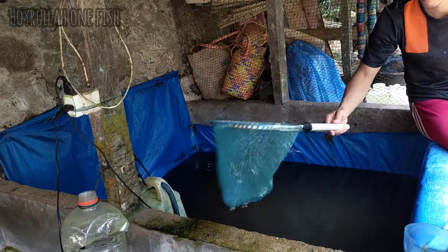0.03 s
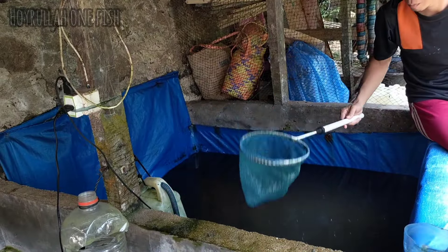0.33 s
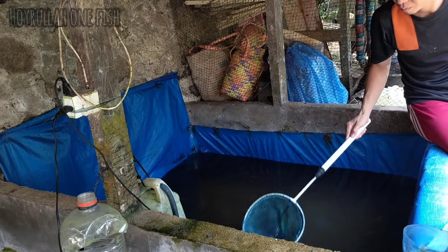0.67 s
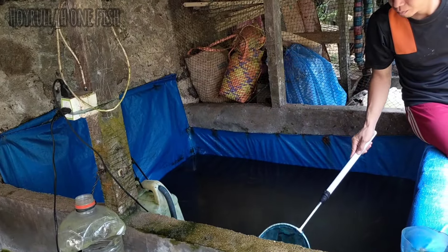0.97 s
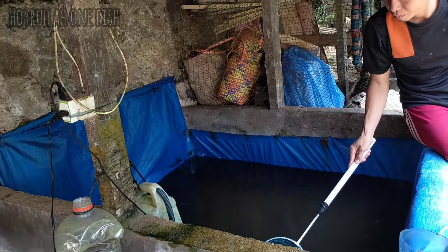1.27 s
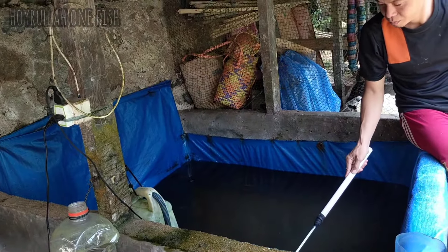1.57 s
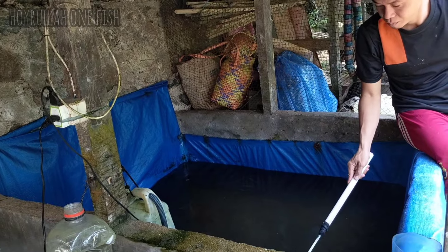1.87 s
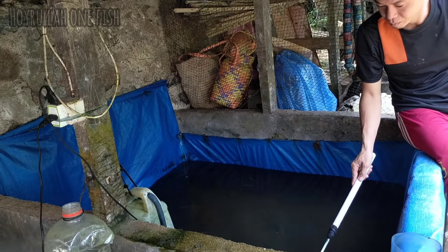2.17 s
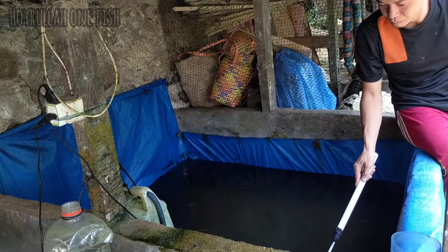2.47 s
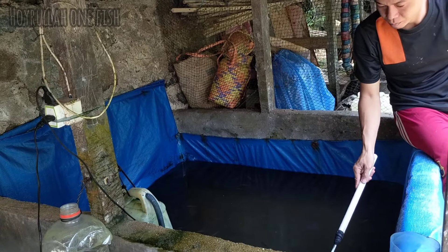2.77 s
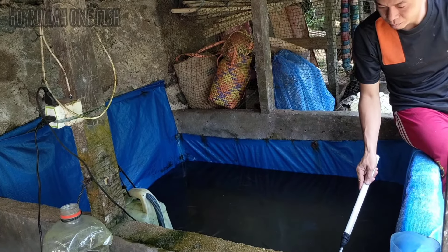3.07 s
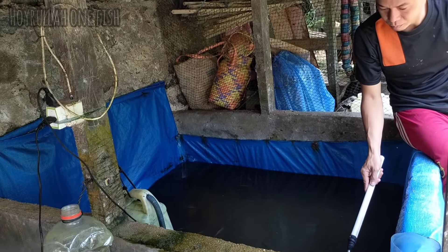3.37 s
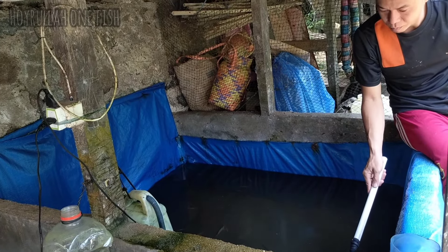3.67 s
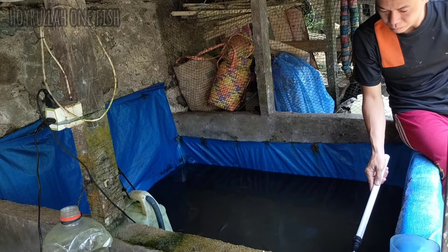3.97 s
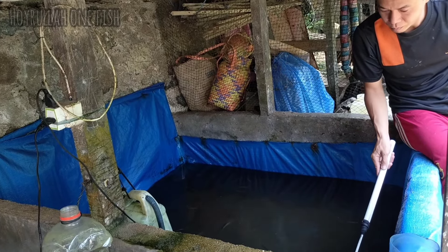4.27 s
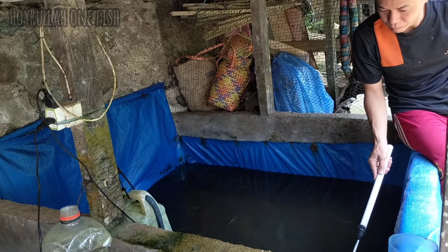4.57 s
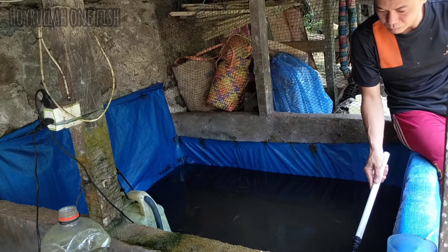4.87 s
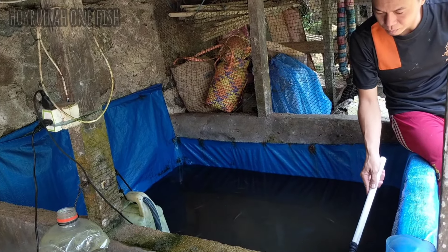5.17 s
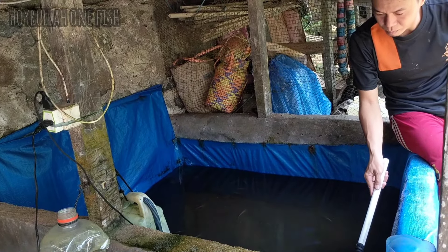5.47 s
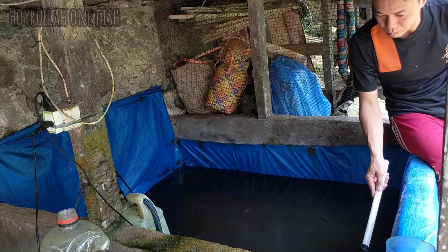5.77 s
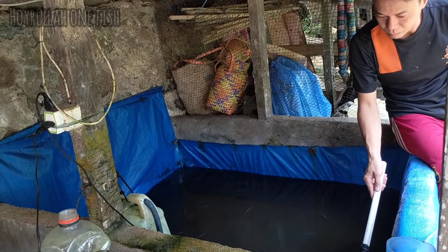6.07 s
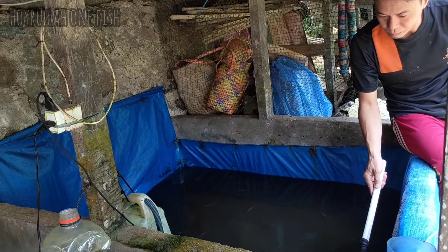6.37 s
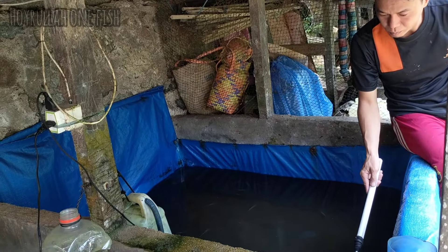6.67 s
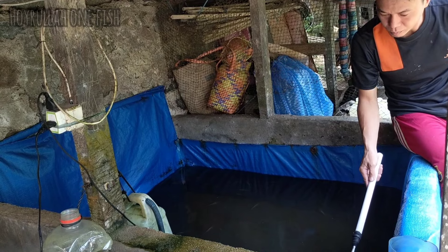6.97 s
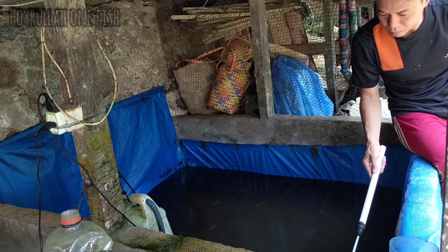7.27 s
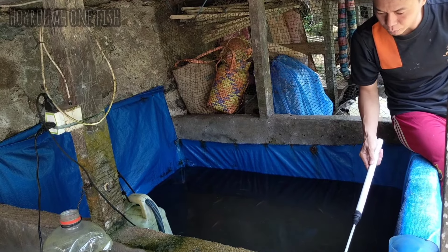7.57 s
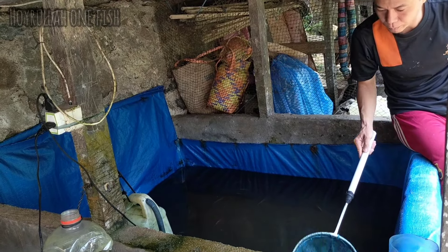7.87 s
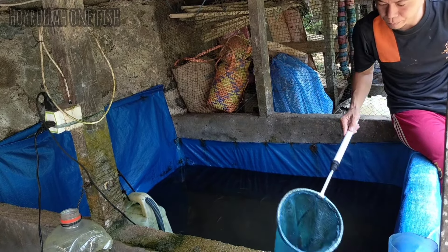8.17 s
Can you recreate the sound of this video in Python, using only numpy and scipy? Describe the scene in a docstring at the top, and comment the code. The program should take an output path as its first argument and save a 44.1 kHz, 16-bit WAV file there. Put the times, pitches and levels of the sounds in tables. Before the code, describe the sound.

A wet hand net flicks drops and sloshes in a tank while a chick peeps repeatedly and engines hum outside.

```python
"""In a low-roofed shed, a hand net is flicked dry, dipped into a tarpaulin-lined tank and drawn along.
The wet mesh snaps, drops plink and trapped air bubbles gulp; cloth swishes on the rim as an arm reaches.
One chick peeps over and over, a second cheeps softly, and something metal clinks once and rings.
Outside, the exhaust pulses of two engines drone away down a road while a third engine idles."""
import sys
import numpy as np
from scipy import signal
from scipy.fft import rfft, irfft, next_fast_len
from scipy.io import wavfile
from scipy.ndimage import uniform_filter1d, map_coordinates

SR = 44100
rng = np.random.default_rng(int(sys.argv[2]) if len(sys.argv) > 2 else 0)


def to_wav(sig):
    """Store sig (one row per channel, or 1-D mono) as 16-bit WAV at the path in sys.argv[1].

    Samples outside -1..1 are clipped; the rate is SR.
    """
    pcm = np.clip(np.atleast_2d(sig), -1, 1) * 32767
    pcm = np.round(pcm).astype(np.int16)
    wavfile.write(sys.argv[1], SR, pcm.T)  # frames by channels


N = 371322
T = np.arange(N) / SR

# The tone colour of each kind of noise: frequency_hz, level_db
RUMBLE_COLOUR = [(18, -29), (30, 24), (50, 0), (60, 1), (75, 23), (100, 15.5), (130, 19.5), (160, 14.5),
                 (190, 9.5), (240, 0.5), (400, -42.5)]
EXHAUST_COLOUR = [(150, -10.5), (240, 2), (330, -0.5), (480, -6), (750, -10.5), (1100, -18.5), (1800, -49)]
TYRE_COLOUR = [(600, -0.5), (1200, 0.5), (1800, -2), (2500, 2.5), (3400, 0), (4400, -10.5), (6000, -14),
               (8000, -22), (11000, -23), (15000, -23)]
FAINT_HISS_COLOUR = [(500, 12.5), (1500, 1.5), (3200, -16), (5000, -9.5), (6400, -25), (7200, -9.5),
                     (7900, -40), (11000, -44), (15500, -35)]
SCRAPE_COLOUR = [(500, -7), (900, 2), (1600, 8), (2400, 5), (4500, -6), (7000, -19), (10000, -25),
                 (15000, -41)]
CLOTH_COLOUR = [(1200, -1), (3000, 14), (5500, 7.5), (8000, 0.5), (11000, 0), (13500, 2), (15500, -4)]
# How alike the two ears hear noise from all around: frequency_hz, likeness (1 = the same)
EAR_LIKENESS = [(60, 0.98), (170, 0.91), (350, 0.91), (700, 0.63), (1300, 0.34), (3000, 0.12),
                (8000, 0.034)]
# How loud the road rumbles: time_s, level_db
RUMBLE_LEVELS = [(0, -41.5), (.7, -40), (1.25, -44.5), (2.1, -44), (2.7, -41), (5, -50), (6.4, -46),
                 (6.8, -49), (7.6, -46.5), (8.42, -48)]

# Groups of exhaust tones for the deep, light and idling engines: multiple_of_firing_rate, level_db
DEEP_BOOM_TONES = [(1, -8), (1.5, -16), (2, 0)]
DEEP_DRONE_TONES = [(3, 0)]
DEEP_HUM_TONES = [(4, 0), (5, -13.5), (6, -12)]
DEEP_BARK_TONES = [(7, -7), (8, -7), (9, -1), (10, -1), (11, -3.5), (12, -10), (13, -13), (15, -17),
                   (17, -18)]
LIGHT_BOOM_TONES = [(1, -6), (2, -2.5), (3, -5.5)]
LIGHT_DRONE_TONES = [(5, 0)]
LIGHT_BARK_TONES = [(4, -15), (6, -6), (7, -6), (8, -12), (10, -20)]
IDLE_BOOM_TONES = [(2, 0.0039)]
IDLE_BARK_TONES = [(3, -2.5), (4, -10)]
# How fast the deep engine fires: time_s, rate_hz
DEEP_FIRING = [(0, 36.4), (1.2, 35.85), (2.3, 35), (3.4, 33.7), (4.8, 33.4), (8.42, 33.7)]
# How loud each part of the deep engine's sound is as it passes: time_s, boom_db, drone_db, hum_db, bark_db
DEEP_LEVELS = [(0, -47, -62, -58, -65), (.6, -45, -62, -52, -61), (1.3, -40, -53, -49, -54),
               (1.8, -44, -47, -40.5, -54), (2.2, -45, -48, -41.5, -55), (2.55, -36, -44, -37, -53.5),
               (3.05, -45, -48, -42.5, -51.5), (3.5, -41, -44.5, -42.5, -54), (4, -43, -49, -46.5, -58.5),
               (4.55, -38, -47, -44.5, -58), (4.8, -39.5, -47, -40.5, -60), (5.2, -45, -44, -46.5, -65),
               (5.85, -54, -43.5, -54, -72), (6.7, -52, -55, -52, -73), (7.7, -58, -64, -61, -74),
               (8.42, -60, -63, -63, -69)]
# How loud the light engine drones: time_s, level_db
LIGHT_DRONE_LEVELS = [(0, -43), (.3, -44), (.6, -40), (.9, -40), (1.15, -50), (1.33, -43.5), (1.9, -47),
                      (2.4, -51), (4, -54), (6, -62), (8.42, -59)]

# Calls of the first and second chick, timed at the dive in pitch: time_s, level_db, pitch_hz, direct_db
PEEP_CALLS = [(.285, -48, 4160, -4), (.642, -47, 4260, 1), (1.027, -45.5, 4250, 0.5), (1.471, -49, 4190, 1),
              (1.869, -48, 4240, -1), (2.262, -52.5, 4200, -5), (2.671, -49, 4140, -3),
              (3.051, -52, 3950, -1), (4.137, -50.5, 4070, -4), (4.475, -49, 4110, -3),
              (4.836, -47, 4120, -3), (5.181, -50.5, 4280, -2.5), (5.569, -50.5, 4020, -3),
              (5.912, -50.5, 4000, 1), (6.274, -47.5, 4130, -6), (6.635, -49.5, 4190, 1),
              (6.987, -50, 3960, 0), (7.33, -50, 3980, -1.5), (7.845, -53.5, 4000, -4),
              (8.237, -54.5, 3920, -1)]
CHEEP_CALLS = [(4.405, -61, 3100, 0), (4.655, -55, 3550, 2), (5.06, -60, 3400, 0), (5.34, -58, 3450, 0),
               (5.715, -55, 3400, 0), (5.86, -55, 3500, 0), (7.96, -61, 3600, -2), (8.09, -60, 3600, 0)]
# One call of each, a thin lead-in and then a loud falling note: time_from_dive_s, pitch_ratio, level_db
PEEP_CURVE = [(-.072, 1.32, -30), (-.052, 1.32, -19.5), (-.032, 1.28, -21), (-.014, 1.23, -17),
              (-.004, 1.12, -17), (0, 1, 1.5), (.007, .95, 1), (.018, .87, -1.5), (.031, .78, -5),
              (.046, .67, -15)]
CHEEP_CURVE = [(-.015, 1.15, -24), (0, 1, -2), (.019, .91, -3.5), (.04, .8, -20)]
# Metal touching and chattering: start_s, level_db, brightness_db, ring_over_scrape_db
METAL_TAPS = [(3.5139, -44, -2, -2), (3.5165, -40.5, 4.5, -3.5), (3.529, -58, 3, -10), (3.537, -43, 10, -7),
              (3.546, -48, 10, -3), (3.553, -48, 15, -10), (3.565, -48, 12, -4)]
# The notes the metal rings with: pitch_hz, level_db, fade_s
METAL_NOTES = [(985, -15, .2), (1228, -14, .1), (1970, -16, .15), (2000, -7.5, .26), (2142, -8, .16),
               (2172, -11, .16), (2202, -5, .23), (2601, -10, .22), (2676, -10, .2), (2734, -14, .18),
               (3325, -11, .26), (3758, -14, .2), (4007, -9, .26), (4035, -11, .26), (4770, -15, .22),
               (5179, -16, .2), (5582, -15, .2), (5900, -17, .2), (6772, -17, .33), (8350, -20, .3),
               (8440, -20, .25), (10060, -25, .25), (11860, -31, .24), (13420, -29, .24)]

# Cloth sliding on the tank's rim: peak_s, level_db, rise_s, fall_s
CLOTH_SLIDES = [(.855, -58.5, 0.13, 0.051), (1.085, -58, 0.039, 0.088), (2.75, -69, .3, 0.31),
                (3.41, -60.5, 0.016, 0.03), (3.73, -58, 0.086, 0.061), (3.945, -63, 0.1, 0.14),
                (4.885, -65, 0.039, 0.027), (4.97, -66, 0.03, 0.022), (5.1, -67, 0.05, 0.043),
                (5.26, -71.5, 0.36, 0.24), (5.68, -64, 0.065, 0.05), (5.985, -64, 0.065, 0.059),
                (6.23, -62.5, 0.046, 0.058), (6.31, -63, 0.063, 0.032), (6.45, -67.5, 0.083, 0.089),
                (7.07, -71.5, 0.03, 0.17), (7.3, -71, 0.037, 0.074), (7.94, -72, 0.24, 0.53),
                (8.09, -78, 0.056, 0.084), (8.26, -73, 0.044, 0.17)]
# Water heaved by the net: start_s, level_db, big_bubble_pitch_hz, length_s, small_over_big_db
NET_SLOSHES = [(1.225, -56, 710, 0.045, -13), (1.566, -62, 695, 0.095, -18), (1.847, -56.5, 710, 0.41, -22),
               (2.7, -58, 622, .5, -18), (4.345, -78, 374, 0.2, 12), (4.55, -55.5, 402, 0.17, -32),
               (5.026, -56, 490, 0.038, -12), (6.51, -50, 400, 0.03, -24), (7.06, -46, 318, 0.044, -12),
               (7.097, -42.5, 263, .1, -23), (7.117, -43, 177.6, 0.12, -17), (7.257, -55.5, 372, 0.054, -8),
               (7.572, -60.5, 420, 0.075, -4)]
# Single drops and bubbles: start_s, level_db, pitch_hz, fade_s, left_over_right_db
WATER_DROPS = [(0.0587, -40, 3060, .02, -6), (.0727, -24, 4110, 0.012, 13), (0.0893, -32, 3850, 0.016, 11),
               (.090, -37, 3430, 0.024, -7), (.1198, -34, 3410, 0.016, -2), (.1198, -40, 3820, 0.011, 4),
               (.132, -46, 2380, 0.031, -1), (.165, -45.5, 3380, 0.031, -6), (1.22, -48, 2450, .03, -8),
               (1.221, -46, 910, 0.046, -2), (1.235, -47, 657, 0.045, 0), (5.028, -55.5, 1230, 0.072, -3),
               (5.05, -55, 914, .07, -2), (5.795, -40, 440, 0.047, 0), (7.061, -45, 840, .05, 5),
               (7.088, -53, 740, .05, 0), (7.118, -25.5, 147, .09, 0), (7.148, -48.5, 766, 0.083, 2),
               (7.185, -42, 265, 0.13, 0), (7.262, -61, 1260, 0.098, -9), (7.58, -49, 529, .08, -6),
               (7.595, -53.5, 750, 0.1, -7), (7.605, -62, 1260, .07, -5)]
# Wet mesh snapping and water spattering:
# start_s, level_db, pitch_hz, width_octaves, fade_s, left_over_right_db, spray_over_snap_db
WET_SNAPS = [(.046, -44, 3880, .35, 0.028, 13, -30), (.050, -45, 1650, .25, .05, 3, -30),
             (.053, -36, 2950, 0.35, 0.14, -8, -24), (.062, -42, 2900, 0.29, .04, -5, -11),
             (0.0727, -38, 4500, 0.28, 0.012, 3, -34), (0.072, -39.5, 1190, 0.67, 0.094, 4, -30),
             (.079, -36.5, 4460, 0.078, 0.036, -3, -30), (.079, -40, 2620, 0.2, 0.058, -6, -30),
             (.088, -36, 3930, 0.21, 0.027, 0, -18), (0.1197, -40.5, 3600, 0.28, .022, 0, -7),
             (0.12, -45, 12300, .25, 0.014, -2, -30), (.164, -53, 3400, 0.33, .03, -3, -11),
             (.22, -52, 4800, 0.22, 0.034, 3, -30), (1.219, -56, 2100, .74, .08, -8, -30),
             (1.238, -50, 1590, 0.59, 0.13, -4, -30), (6.296, -53, 2700, 0.39, 0.068, -10, -30),
             (7.06, -47, 520, 0.45, 0.077, -7, -35), (7.281, -63, 2400, .17, .05, 0, -25),
             (8.083, -71, 13300, .15, .05, -2, -20), (8.12, -74, 11300, .12, .06, -2, -20),
             (8.275, -68, 6100, .12, .05, 4, -20)]
# A rising blip after the flick: time_s, pitch_hz, level_db
BLIP_CURVE = [(.23, 860, -62), (.238, 890, -49), (.252, 930, -49), (.261, 1030, -56), (.269, 1120, -49),
              (.277, 1400, -55), (.286, 1900, -49), (.292, 2150, -51), (.298, 2500, -45), (.305, 2850, -58)]


def gain(db):
    """Turn decibels into a number to multiply by."""
    return 10 ** (np.asarray(db) / 20)


def normalise(x):
    """Scale a sound to an average power of 1."""
    return x / np.sqrt(np.mean(x ** 2) + 1e-20)


def curves(table, t=T):
    """Join the points in each column of a table with straight lines in time."""
    times, *columns = np.transpose(table)
    return [np.interp(t, times, column) for column in columns]


def across_spectrum(points, size):
    """Spread (frequency_hz, value) points over every frequency of a sound `size` samples long."""
    hz, value = np.transpose(points)
    return np.interp(np.log(np.fft.rfftfreq(size, 1 / SR) + 1), np.log(hz), value)


def colour(x, points):
    """Turn each frequency of a sound up or down."""
    return irfft(rfft(x) * gain(across_spectrum(points, len(x))), len(x))


def pan(db):
    """Left and right gains: a positive value leans left."""
    return gain(np.array([[db], [-db]]) / 2)


def add(out, start_s, x):
    """Mix a sound in at a given time."""
    i = max(int(start_s * SR), 0)
    out[..., i:i + x.shape[-1]] += x[..., :out.shape[-1] - i]


def fade(t, fade_s):
    """Die away by 60 dB every fade_s seconds."""
    return np.exp(-np.log(1000) * t / fade_s)


def wander(rate_hz):
    """A smooth random wobble, mostly between -1 and 1."""
    points = rng.standard_normal(int(N / SR * rate_hz) + 4)
    smooth = map_coordinates(points, [T[::64] * rate_hz + rng.random()], order=3, mode="nearest")
    return np.interp(T, T[::64], smooth)


def wide_noise(points):
    """Noise from all around: alike at both ears in the bass, unrelated in the treble."""
    size = next_fast_len(N)
    alike = np.clip(across_spectrum(EAR_LIKENESS, size), -1, 1)
    spectra = rfft(rng.standard_normal((2, size))) * gain(across_spectrum(points, size))
    shared, opposite = irfft(spectra * np.sqrt([1 + alike, 1 - alike]), size)[:, :N]
    return np.array([shared + opposite, shared - opposite]) / shared.std()


def echoes(x, echo_db, fade_s):
    """Dense echoes off the walls and roof, soft in the treble and different at each ear."""
    t = np.arange(SR // 2) / SR
    noise = rng.standard_normal((2, len(t)))
    dull = signal.sosfilt(signal.butter(2, 4500, fs=SR, output="sos"), noise)
    tail = dull * fade(t, fade_s) + .5 * noise * fade(t, 1.02 * fade_s)
    tail *= 1 - np.exp(-t / .0054)  # the echoes take a moment to build
    tail /= np.sqrt(np.sum(fade(t, fade_s) ** 2))
    return gain(echo_db) * signal.fftconvolve(x, tail, axes=1)[:, :N]


def in_shed(x, echo_db, fade_s):
    """A sound together with its echoes under the roof."""
    return x + echoes(x, echo_db, fade_s)


def from_side(x, lag_s):
    """Sound from the road reaches the right ear a little after the left."""
    return np.array([x[0], np.interp(T - lag_s, T, x[1])])


def drive_past(closest_s, speed_m_s, lane_m):
    """A vehicle's distance in metres, and its direction from -1 (coming) to 1 (going)."""
    along_m = speed_m_s * (T - closest_s)
    distance_m = np.hypot(along_m, lane_m)
    return distance_m, along_m / distance_m


def exhaust(firing_hz, groups, swell_db, flutter):
    """Exhaust pulses make a stack of tones; each wavers as its path between the houses changes."""
    firing_phase = 2 * np.pi * np.cumsum(firing_hz * (1 + flutter * wander(14))) / SR
    out = np.zeros(N)
    for tones, group_db in groups:
        for multiple, tone_db in tones:
            phase = multiple * firing_phase + 2 * np.pi * rng.random() + .2 * wander(3.096)
            waver_db = swell_db * (wander(1.6) + 1.3 * wander(9))
            out += gain(group_db + tone_db + waver_db) * np.sin(phase)
    return np.sqrt(2) * out


def deep_engine():
    """A heavy engine goes past, its pitch sinking; rushing gas roars along with its bark."""
    firing_hz, = curves(DEEP_FIRING)
    boom_db, drone_db, hum_db, bark_db = curves(DEEP_LEVELS)
    groups = [(DEEP_BOOM_TONES, boom_db), (DEEP_DRONE_TONES, drone_db),
              (DEEP_HUM_TONES, hum_db), (DEEP_BARK_TONES, bark_db)]
    tones = exhaust(firing_hz, groups, swell_db=1.8, flutter=.005)
    return tones + wide_noise(EXHAUST_COLOUR) * gain(bark_db - 6)


def light_engine():
    """A lighter engine passes early: its pitch drops, its bark fades and its tailpipe booms after it."""
    speed_m_s, lane_m, sound_speed_m_s = 8, 9, 343
    tailpipe_db, throb_db, throb_hz = 3.5, 3.8, 5.65
    distance_m, going = drive_past(closest_s=.5, speed_m_s=speed_m_s, lane_m=lane_m)
    firing_hz = 43.99 / (1 + going * speed_m_s / sound_speed_m_s)
    loss_db = 20 * np.log10(distance_m / lane_m)
    boom_db = -42 - loss_db + tailpipe_db * going + .07 * distance_m  # the boom lingers with distance
    bark_db = -44.5 - 1.2 * loss_db  # the bark fades faster than in open air
    drone_db = curves(LIGHT_DRONE_LEVELS)[0] + throb_db * np.cos(2 * np.pi * throb_hz * (T - .03))
    groups = [(LIGHT_BOOM_TONES, boom_db), (LIGHT_BARK_TONES, bark_db), (LIGHT_DRONE_TONES, drone_db)]
    return exhaust(firing_hz, groups, swell_db=1.3, flutter=.006)


def idling_engine():
    """A standing engine thuds evenly and barks more towards the end."""
    bark_db = np.interp(T, [5.82, 6.35], [-65, -46.5])
    groups = [(IDLE_BOOM_TONES, -50.5), (IDLE_BARK_TONES, bark_db)]
    return exhaust(firing_hz=26.45, groups=groups, swell_db=2.0, flutter=.0054)


def road():
    """Three engines over a rumble; roar and tyres sink as traffic moves off, a faint hiss stays."""
    lane_m = 24.5
    distance_m, _ = drive_past(closest_s=.91, speed_m_s=13.8, lane_m=lane_m)
    doublings = np.log2(distance_m / lane_m)
    engines = deep_engine() + light_engine() + idling_engine()
    rumble = wide_noise(RUMBLE_COLOUR) * gain(curves(RUMBLE_LEVELS)[0])
    roar = wide_noise(EXHAUST_COLOUR) * gain(-49.5 - 6 * doublings + 2 * wander(7.4))
    tyres = wide_noise(TYRE_COLOUR) * gain(-56 - 6.5 * doublings + .5 * wander(11)) * pan(-5.5)
    faint_hiss = wide_noise(FAINT_HISS_COLOUR) * gain(-61)  # steady, with a thin high band
    bass = (engines + rumble + roar) * pan(1.1)
    return from_side(bass, lag_s=.00025) + from_side(tyres + faint_hiss, lag_s=.0004325)


def whistle(curve, waver, pitch_scale=1, rough_db=4):
    """A tone that follows a curve of pitch and level, pure when soft and rough when forced."""
    t = np.arange(curve[0][0], curve[-1][0], 1 / SR)
    pitch, db = curves(curve, t)
    strain = np.sqrt(gain(db - db.max()))
    bend, shake = strain * normalise(uniform_filter1d(rng.standard_normal((2, len(t))), size=120))
    phase = 2 * np.pi * np.cumsum(pitch * pitch_scale * (1 + waver * bend)) / SR
    soft_ends = signal.windows.tukey(len(t), .1)
    return np.sqrt(2) * gain(db + rough_db * shake) * np.sin(phase) * soft_ends


def chick(calls, curve, gain_db, pan_db):
    """Falling peeps, heard mostly off the walls; the direct sound weakens when the chick turns away."""
    voice, direct = np.zeros(N), np.zeros(N)
    for dive_s, db, hz, direct_db in calls:
        peep = whistle(curve, waver=.036, pitch_scale=hz) * gain(db + gain_db)
        start_s = dive_s + curve[0][0]
        add(voice, start_s, peep)
        add(direct, start_s, peep * gain(direct_db))
    return direct * pan(pan_db) + echoes(voice * pan(pan_db), echo_db=4, fade_s=.3)


def metal_clink(scrape_fade_s, attack_s):
    """A quick chatter of gritty taps; each sets the same notes ringing, a little differently."""
    out, t = np.zeros(N), np.arange(SR // 2) / SR
    for start_s, db, bright_db, ring_db in METAL_TAPS:
        detunes = 1 + .002 * rng.standard_normal(len(METAL_NOTES))
        ring = np.zeros(len(t))
        for (hz, note_db, fade_s), detune in zip(METAL_NOTES, detunes):
            phase = 2 * np.pi * (hz * detune * t + rng.random())
            ring += gain(note_db) * fade(t, fade_s) * np.sin(phase)
        grit = colour(rng.standard_normal(len(t)), SCRAPE_COLOUR)
        grit = colour(grit, [(1500, -bright_db), (5000, bright_db)])
        scrape = normalise(grit) * fade(t, scrape_fade_s)
        onset = 1 - np.exp(-t / attack_s)
        add(out, start_s, gain(db) * (gain(ring_db) * ring + scrape) * onset)
    return out * pan(-9)


def cloth():
    """Cloth slides on tarpaulin: many tiny catches make a hiss that swells and dies."""
    power = np.zeros(N)
    for peak_s, db, rise_s, fall_s in CLOTH_SLIDES:
        from_peak = np.maximum((peak_s - T) / rise_s, (T - peak_s) / fall_s)
        power += gain(db) ** 2 * np.exp(-2 * np.minimum(from_peak, 20))
    catches_db = 2.5 * wander(400)
    return wide_noise(CLOTH_COLOUR) * np.sqrt(power) * gain(catches_db) * pan(-3)


def bubbles(hz, length_s, ring_cycles=26, pitch_rise=.12, spread_octaves=.18, bubbles_per_s=70):
    """A cloud of bubbles; each rings briefly and rises in pitch as it comes to the surface."""
    t = np.arange(SR // 5) / SR
    cloud = np.zeros(int(length_s * SR) + len(t))
    draws = rng.random((80, 3))[:3 + int(bubbles_per_s * length_s)]
    for k, (early, height, force) in enumerate(draws):
        pitch_hz = hz * 2 ** (spread_octaves * (2 * height - 1))
        life_s = ring_cycles / pitch_hz
        phase = 2 * np.pi * np.cumsum(pitch_hz * (1 + pitch_rise * np.minimum(t / life_s, 1))) / SR
        start_s = length_s * max(k - early, 0) / len(draws)
        add(cloud, start_s, (1.3 + force) * np.sin(phase) * fade(t, life_s))
    return cloud / np.sqrt(np.sum(cloud ** 2) / (length_s * SR))


def sloshes(gain_db, small_pitch_ratio=2.52):
    """Each slosh traps big bubbles that gulp and small ones that plink above them."""
    out = np.zeros((2, N))
    for start_s, db, hz, length_s, small_db in NET_SLOSHES:
        for pitch_hz, level_db in (hz, db), (hz * small_pitch_ratio, db + small_db):
            add(out, start_s, bubbles(pitch_hz, length_s) * gain(level_db + gain_db) * pan(.26))
    return out


def plinks(pitch_rise=.042, attack_cycles=2.3):
    """Each single drop traps one bubble, which rings briefly and rises a little in pitch."""
    out, t = np.zeros((2, N)), np.arange(SR // 6) / SR
    for start_s, db, hz, fade_s, pan_db in WATER_DROPS:
        cycles = np.cumsum(hz * (1 + pitch_rise * np.minimum(t / fade_s, 1))) / SR
        onset = 1 - np.exp(-(cycles / attack_cycles) ** 2)
        ring = np.sin(2 * np.pi * cycles) * fade(t, fade_s) * onset
        add(out, start_s, np.sqrt(2) * gain(db) * ring * pan(pan_db))
    return out


def wet_burst(hz, width_octaves, fade_s, grain_db=5, attack_s=.00027):
    """A sharp, grainy burst of noise that dies at once, partly alike at the two ears."""
    t = np.arange(SR // 6) / SR
    octave = np.log2(np.fft.rfftfreq(len(t), 1 / SR) + 1)
    grains = rng.standard_normal((3, len(t))) * gain(grain_db * rng.standard_normal(len(t)))
    band = 1 / (1 + ((octave - np.log2(hz)) / width_octaves) ** 2) ** 1.08
    noise = irfft(rfft(grains[:2] + grains[2]) * band, len(t))  # both ears share the third row
    onset, decay = 1 - np.exp(-(t / attack_s) ** 2), fade(t, fade_s)
    return normalise(noise * decay * onset) * decay.std()


def net_spatter():
    """Wet mesh snaps and water spatters, throwing off fine spray; a rising blip follows the flick."""
    out = np.zeros((2, N))
    for start_s, db, hz, width_octaves, fade_s, pan_db, spray_db in WET_SNAPS:
        snap = wet_burst(hz, width_octaves, fade_s) * pan(pan_db)
        spray = wet_burst(hz=12300, width_octaves=.22, fade_s=.085) * pan(-2)
        add(out, start_s, gain(db) * (snap + gain(spray_db) * spray))
    blip = whistle(BLIP_CURVE, waver=.07) * gain(-4) * pan(-1.5)
    add(out, BLIP_CURVE[0][0], blip)
    return out


def scene():
    """The tank close by, chicks and metal further off in the shed, the road outside."""
    chicks = chick(PEEP_CALLS, PEEP_CURVE, gain_db=-10, pan_db=-1)
    chicks += chick(CHEEP_CALLS, CHEEP_CURVE, gain_db=-11, pan_db=-2)
    drops = in_shed(net_spatter() + plinks(), echo_db=-7.5, fade_s=.18)
    tank = in_shed(sloshes(gain_db=-3), echo_db=-5, fade_s=.28)
    clink = gain(-3.5) * in_shed(metal_clink(scrape_fade_s=.08, attack_s=.001), echo_db=-2.5, fade_s=.3)
    return road() + cloth() + drops + tank + clink + chicks


def record(dry):
    """The microphone loses the deepest bass and the highest treble."""
    lowest_hz, highest_hz = 20, 15400
    x = signal.sosfilt(signal.butter(2, lowest_hz, "high", fs=SR, output="sos"), dry)
    return signal.sosfilt(signal.ellip(10, .2, 80, highest_hz, fs=SR, output="sos"), x)


dry = scene()
out = record(dry)
to_wav(out)
```